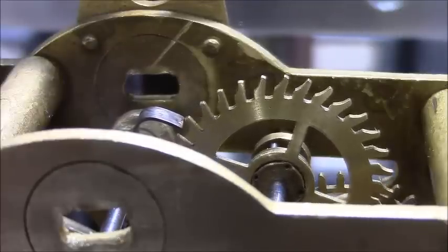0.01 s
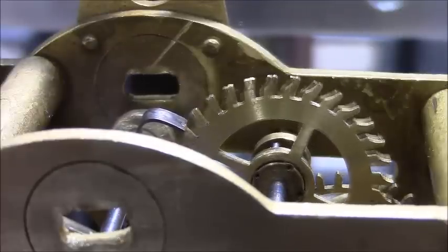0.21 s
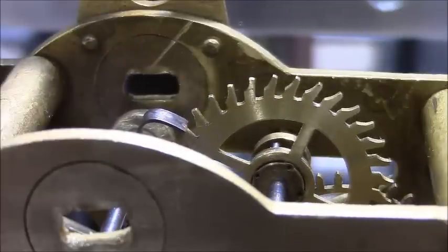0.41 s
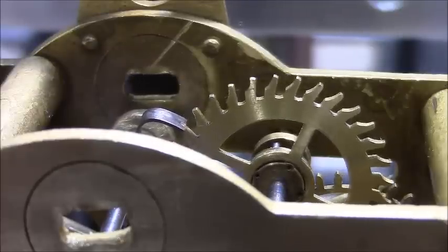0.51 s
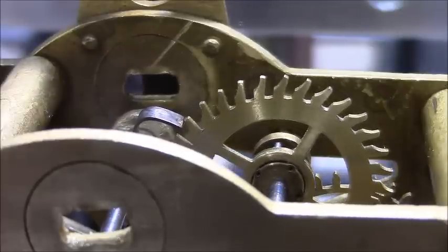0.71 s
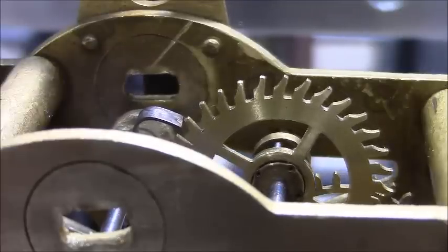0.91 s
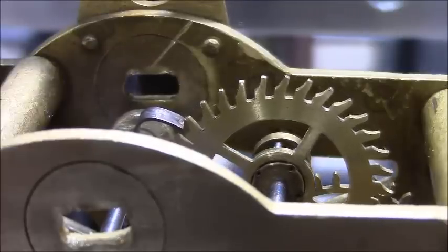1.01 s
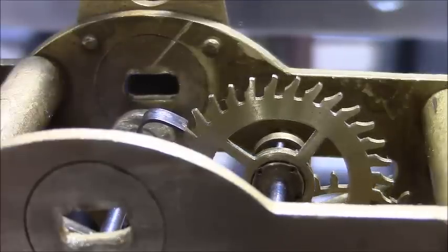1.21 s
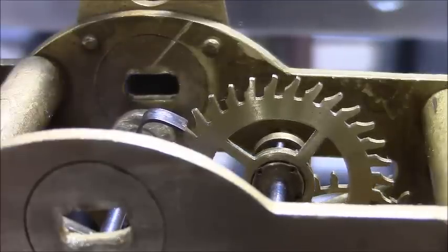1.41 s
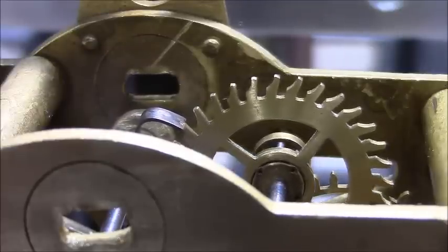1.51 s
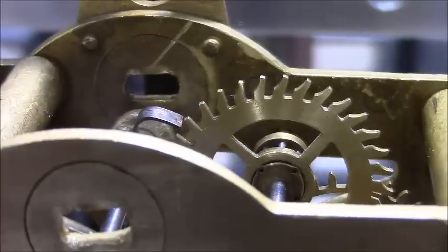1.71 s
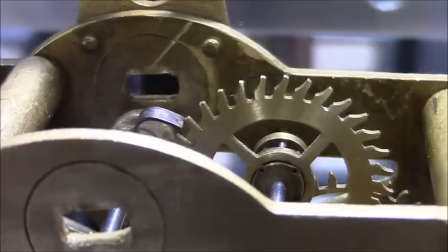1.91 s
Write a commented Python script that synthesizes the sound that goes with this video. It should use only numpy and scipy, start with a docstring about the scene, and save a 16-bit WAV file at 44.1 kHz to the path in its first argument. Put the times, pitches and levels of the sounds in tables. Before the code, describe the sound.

A mechanical clock ticks close by, about two beats a second, over faint hum and room air

```python
"""A faint beat of a far clock over mains hum and room air, then a close brass clock movement in a quiet room.
Escape wheel teeth drop on the two pallets in turn, a full tock and a thin tick, and chatter before they rest:
each contact excites damped modes of plates and case, with a short hiss for the crowd of small high modes.
Between beats the parts rub: grainy friction noise sounds through the same modes. The far clock is coloured
noise bursts, the air shaped noise, the hum wavering sines; decaying noise tails give the room's answer."""
import sys
import numpy as np
from scipy import signal
from scipy.fft import rfft, irfft, next_fast_len
from scipy.io import wavfile
from scipy.ndimage import uniform_filter1d, map_coordinates

SR = 44100
rng = np.random.default_rng(int(sys.argv[2]) if len(sys.argv) > 2 else 0)


def dump(signal):
    """Clip the signal to [-1, 1] and save it as 16-bit WAV at the path in sys.argv[1]."""
    limited = np.clip(np.atleast_2d(signal).T, -1, 1)
    pcm = np.round(limited * 32767).astype(np.int16)
    wavfile.write(sys.argv[1], SR, pcm)


N = 88200  # samples, 2 s


def amp(db):
    """Decibel law: 20 dB is a factor of ten in amplitude."""
    return 10 ** (np.asarray(db) / 20)


def unit(x):
    """Normalisation to a root-mean-square of one."""
    return x / np.sqrt(np.mean(x ** 2) + 1e-20)


def along(points, hz):
    """Interpolation of (frequency [Hz], value) points on a logarithmic frequency axis."""
    f, value = np.transpose(points)
    return np.interp(np.log(hz + 1), np.log(f + 1), value)


def wobble(rate):
    """Band-limited fluctuation: a smooth curve through random knots, rate of them a second."""
    knots = rng.standard_normal(int(N * rate / SR) + 4)
    return map_coordinates(knots, [np.arange(N) * rate / SR])


def filtered(x, response):
    """Linear filtering: the spectrum of x times a complex response of frequency."""
    size = next_fast_len(N + SR // 2)  # padded against wrap-around
    hz = np.fft.rfftfreq(size, 1 / SR)
    return irfft(rfft(x, size) * response(hz), size)[..., :N]


ROOM_WIDTH = 0.19  # side amplitude as a share of mid


def spread(mid, side):
    """Mid-side stereo: a partly independent side signal makes a sound diffuse."""
    return np.array([mid + ROOM_WIDTH * side, mid - ROOM_WIDTH * side])


# mains lines: (frequency [Hz], level [dB rms], about which it wavers)
HUM_LINES = [(120, -84), (360, -73.5), (480, -73.5), (600, -70.5)]


def mains_hum():
    """Harmonic line spectrum: steady sines at multiples of 120 Hz, each wavering slightly in level."""
    t = np.arange(N) / SR
    hum = np.zeros(N)
    for hz, db in HUM_LINES:
        phase = 2 * np.pi * (hz * t + rng.random())
        hum += np.sqrt(2) * amp(db + 0.68 * wobble(4.9)) * np.sin(phase)
    return hum


# spectrum of the room air: (frequency [Hz], relative density [dB per Hz])
AIR_SPECTRUM = [(15, -50), (25, -16), (60, -19.5), (108, -8.5), (344, -2), (560, -8), (900, -7),
                (1260, -13.5), (1550, -12), (2000, -14), (2480, -17.5), (3400, -16), (4500, -22.5),
                (6200, -23.5), (7000, -20.5), (7800, -28), (8600, -27), (11500, -30), (12800, -33),
                (13600, -28.5), (14300, -35), (16000, -47)]
# likeness of left and right in the air: (frequency [Hz], correlation [0 to 1])
AIR_LIKENESS = [(60, 0.088), (180, 0.72), (550, 0.5), (1650, 0.69), (4970, 0.78), (15000, 0.86)]
AIR_DB = -58.5  # dB rms, about which it wavers


def room_air():
    """Diffuse noise field: broadband noise whose left-right correlation depends on frequency."""
    def mid_and_side(hz):
        angle = np.arccos(np.clip(along(AIR_LIKENESS, hz), -1, 1)) / 2
        return amp(along(AIR_SPECTRUM, hz)) * [np.cos(angle), np.sin(angle)]

    mid, side = filtered(rng.standard_normal((2, N)), mid_and_side)
    return amp(AIR_DB + 0.24 * wobble(1.94)) * unit(np.array([mid + side, mid - side]))


# beats of the far clock: (time [s], level [dB], kind [rounds to 0 bright or 1 dull])
FAR_BEATS = [(-.028, -52.5, 0.27), (.519, -54.5, 1), (0.891, -53, 0), (1.438, -56.5, 1),
             (1.81, -54.5, 0.21)]
# resonances of the bright and of the dull beat: (frequency [Hz], width [Hz], relative level [dB])
FAR_RESONANCES = [
    [(1150, 450, -2), (2770, 820, -6), (4300, 380, -4.5), (5660, 550, -3.5), (6800, 1200, -8.5)],
    [(1590, 270, -3), (2760, 260, -2.5), (4330, 130, -3), (5760, 440, -16), (6800, 640, -25)],
]
FAR_T60_S, FAR_RISE_S = 0.2, 0.0012


def far_clock():
    """Resonance and reverberation: each beat is a short blur of echoes, noise through a few resonances."""
    out = np.zeros((2, N))
    for start, db, kind in FAR_BEATS:
        t = np.maximum(np.arange(N) / SR - start, 0)

        def colour(f):
            total = 0
            for k, (centre, width, peak_db) in enumerate(FAR_RESONANCES[round(kind)]):
                damping = 1j * f * width
                resonance = damping / (centre * centre - f * f + damping)
                total = total + (-1) ** k * amp(peak_db) * resonance  # neighbours in opposite sense
            return total

        blur = unit(spread(*filtered(rng.standard_normal((2, N)), colour)))
        out += blur * amp(db - 60 * t / FAR_T60_S) * (1 - np.exp(-t / FAR_RISE_S))
    return out


# decay of the room: (frequency [Hz], reverberation time t60 [s])
ROOM_DECAY = [(300, 0.42), (2000, 0.2), (10000, 0.21)]
ROOM_DB, ROOM_GAP_S = -17.5, 0.0055  # level of the answer, delay before it


def room(x):
    """Reverberation: convolution with noise tails in which each frequency dies at its own speed."""
    out, step = np.zeros((2, N + SR)), SR // 8
    late = np.pad(x, (int(ROOM_GAP_S * SR), 0))
    for first in range(0, N, step):  # every eighth of a second has its own tail
        hz, t, noise = signal.stft(rng.standard_normal((2, SR // 3)), SR, nperseg=256)
        decay = amp(-60 * t / along(ROOM_DECAY, hz)[:, None])
        mid, side = signal.istft(noise * decay, SR, nperseg=256)[1]
        tail = spread(mid, side)
        tail = tail / np.linalg.norm(tail[0])
        part = signal.fftconvolve(late[None, first:first + step], tail, axes=1)
        out[:, first:first + part.shape[1]] += part
    return out[:, :N]


# modes of plates and case:
# (frequency [Hz], t60 [s], relative level from the tock pallet [dB], from the tick pallet [dB])
PLATE_MODES = [(371, 0.067, -4, -3.5), (473, 0.042, 0, 0.5), (566.6, 0.15, -7.5, -17),
               (634.5, 0.092, -6, -8.5), (700.6, 0.11, 2.5, -8), (759, 0.024, -6.5, -15),
               (874.5, 0.086, -9.5, -11), (1254, .045, 5, 6.5), (1340, 0.11, -1.5, -0.5),
               (1357, .2, -16, -26), (1436, 0.12, -25.5, -2), (1558, 0.052, 9.5, 1.5),
               (1719, 0.071, 5, 4.5), (1855, 0.026, 4, 7), (2020, 0.059, -3, 2.5), (2229, 0.05, -1, -24),
               (2455, 0.032, 3.5, -0.5), (2425, 0.26, -24, -21), (2818, 0.044, -3.5, 5),
               (3112, 0.034, 4, 10), (3265, 0.014, 1.5, 5), (3444, 0.026, 5.5, 9.6),
               (3722, 0.027, -2.5, 10.5), (4040, 0.065, -14, -14.5), (4240, 0.041, -41, -3),
               (5184, 0.11, -21.5, -11), (5600, 0.12, -30, -35), (5374, 0.032, -32.5, -4),
               (6840, 0.039, -15.5, -14), (7035, 0.052, -20, -3.5), (7720, 0.046, -17, -8),
               (8800, 0.075, -26, -48)]
RISE_CYCLES = 1.98  # how slowly a mode takes up the blow
SMEAR = .006  # line width from random phase drift, as a share of the pitch at 2 kHz, growing with pitch


def ring(pallet, tilt_db, t, scatter_db):
    """Modal superposition: one contact on a pallet (0 tock, 1 tick) excites a sum of damped sines."""
    hz, t60, *pallet_db = np.transpose(PLATE_MODES)[:, :, None]
    level = pallet_db[pallet] + tilt_db * np.log2(hz / 2000)
    level = level + scatter_db * rng.standard_normal(hz.shape)
    sense = (-1.) ** np.arange(len(hz))[:, None]  # neighbours in opposite sense
    rise = 1 - np.exp(-t * hz / RISE_CYCLES)
    # random walk of phase, smoothed
    steps = rng.standard_normal((len(hz), len(t)))
    drift = np.cumsum(steps, axis=1) * np.sqrt(2 * np.pi * SMEAR * hz * hz / 2000 / SR)
    drift = uniform_filter1d(drift, size=45, axis=1)
    tones = np.sin(2 * np.pi * hz * t + drift)
    return (sense * amp(level - 60 * t / t60) * rise * tones).sum(0)


# spectrum of the crowd of small high modes:
# (frequency [Hz], relative level from the tock pallet [dB], from the tick pallet [dB])
HIGH_MODES = [(905, -44, -40), (1920, 4.5, -21), (3820, 7, 2), (6260, 2.3, -2.5), (7440, -13, 2.5),
              (8100, -25, -43), (9580, -3.5, -6), (11300, -23, -24), (11300, -7.5, -8), (13400, -18, -22),
              (14300, -23, -12), (14400, -30, -34), (16000, -40, -38)]
HISS_DB, HISS_T60_S, HISS_RISE_S = -5, 0.033, 0.0013


def hiss(pallet, tilt_db, t):
    """Modal overlap: modes too dense to tell apart act as a short burst of coloured noise."""
    hz = np.fft.rfftfreq(len(t), 1 / SR)
    points = np.array(HIGH_MODES)[:, [0, 1 + pallet]]
    colour = unit(amp(along(points, hz))) * amp(tilt_db * np.log2((hz + 1) / 2000))
    noise = irfft(rfft(rng.standard_normal(len(t))) * colour, len(t))
    return noise * amp(HISS_DB - 60 * t / HISS_T60_S) * (1 - np.exp(-t / HISS_RISE_S))


# rubbing through one swing: (time before the landing [s], relative level [dB])
RUB_SWING = [(.36, -65), (0.33, -81.5), (0.19, -61.5), (0.085, -64), (0.09, -64.5), (0.016, -60),
             (0.0015, -52)]
# landings that end each swing: (time [s], added level of the rubbing before it [dB])
SWING_LANDINGS = [(.2305, 1.5), (0.7, -1.5), (1.19, -3.4), (1.651, -3.2), (2.148, -2)]
# small catches while a tooth slides, brief rises of the friction: (time [s], level [dB], length [s])
SLIDE_CATCHES = [(0.048, -67.5, 0.0046), (0.092, -67, 0.004), (0.125, -62, 0.0035), (0.196, -78, 0.007),
                 (0.213, -52, 0.0082), (0.613, -73.5, .008), (0.644, -58, 0.0085), (0.993, -65, 0.0038),
                 (1.11, -57, 0.0061), (1.178, -42, 0.0027), (1.515, -63, 0.0047), (1.587, -61.5, 0.015),
                 (1.651, -35, 0.0046), (1.935, -68, 0.0083)]
RUB_GRAIN_DB, RUB_TILT_DB = 5, 4.5  # depth of the graininess in dB, hardness in dB per octave


def rubbing():
    """Friction excitation: grainy noise, strongest near each landing, drives the plate modes."""
    t = np.arange(N) / SR
    before, swing_db = np.transpose(RUB_SWING)
    level = np.zeros(N)
    for landing, more_db in SWING_LANDINGS:
        level += amp(more_db + np.interp(t, landing - before, swing_db, left=-120, right=-120))
    for centre, db, length in SLIDE_CATCHES:
        level += amp(db) * np.exp(-.5 * ((t - centre) / length) ** 2)
    grit = unit(rng.standard_normal(N) * amp(RUB_GRAIN_DB * wobble(90)))
    body = ring(0, RUB_TILT_DB, np.arange(SR // 5) / SR, 0)
    return signal.fftconvolve(grit * level, body / np.linalg.norm(body))[:N]


# tooth on pallet, a light touch, the landing and its bounces:
# (time [s], relative level [dB], hardness [dB per octave about 2 kHz])
TOCK_CONTACTS = [(0.2178, -45.5, 2.7), (0.2302, -29.5, 2.5), (.2345, -30, 1.3), (0.2383, -33, -2),
                 (.2445, -41.5, -2), (1.1785, -56, 9.2), (1.1875, -49, .1), (1.189, -31, 2.8),
                 (1.1928, -28, 0.24), (1.197, -33.5, 0.2), (1.203, -55, -5)]
TICK_CONTACTS = [(0.7017, -35.5, 2.23), (.7038, -45.5, 4.5), (.7075, -43, -1), (0.7108, -50.5, -5),
                 (1.6465, -55, -6), (1.651, -34.5, 2.8), (1.6528, -42, -1), (1.657, -50, -1.5),
                 (1.664, -51.5, -4.5)]
SCATTER_DB = 1.  # random level spread per mode and contact


def contacts():
    """Impact excitation: every touch, landing and bounce rings the plates, harder ones more brightly."""
    out, k = np.zeros(N + SR), np.arange(SR // 7)
    for pallet, rows in enumerate((TOCK_CONTACTS, TICK_CONTACTS)):
        for start, db, tilt_db in rows:
            first = int(np.ceil(start * SR))
            t = (first + k) / SR - start  # keeps timing finer than one sample
            blow = ring(pallet, tilt_db, t, SCATTER_DB) + hiss(pallet, tilt_db, t)
            out[first:first + len(k)] += amp(db) * blow
    return out[:N]


LOW_CUT_HZ = 127


def movement():
    """Radiation efficiency: the small movement sends out no bass, a second-order low cut."""
    return filtered(contacts() + rubbing(), lambda hz: (1j * hz / (LOW_CUT_HZ + 1j * hz)) ** 2)


# stereo width of the movement: (frequency [Hz], side level relative to mid [dB])
MOVEMENT_WIDTH = [(300, -63), (1300, -27), (4400, -15), (12000, -13)]
LEAN_DB = 0.25  # left raised and right lowered by this


def scene():
    """Superposition: the movement near the middle, wider in the treble, over its room and background."""
    works = movement()
    side = filtered(works, lambda hz: 1j * amp(along(MOVEMENT_WIDTH, hz)))  # a quarter cycle apart
    near = np.array([works + side, works - side]) * amp([[LEAN_DB], [-LEAN_DB]])
    return near + amp(ROOM_DB) * room(works) + far_clock() + room_air() + mains_hum()


def record(dry):
    """Band limitation: nothing is kept from 16050 Hz upwards."""
    return filtered(dry, lambda hz: hz < 16050)


dry = scene()
out = record(dry)
dump(out)
```